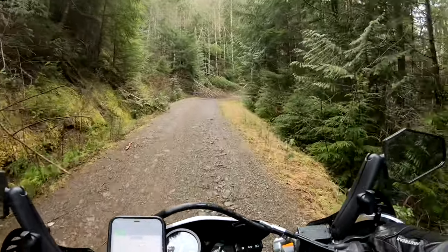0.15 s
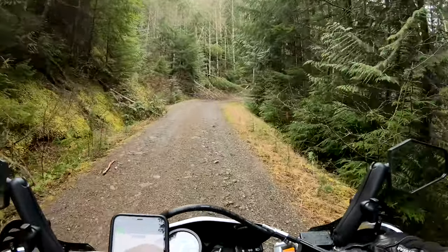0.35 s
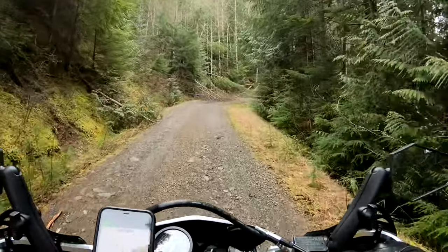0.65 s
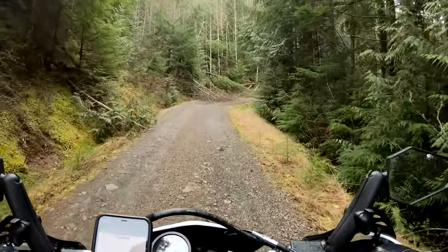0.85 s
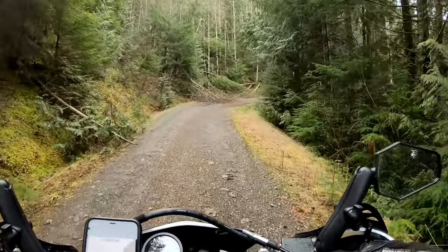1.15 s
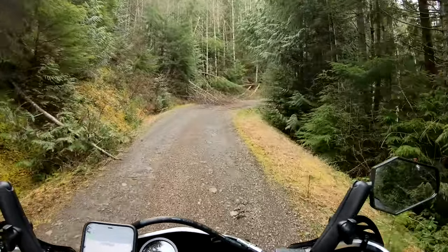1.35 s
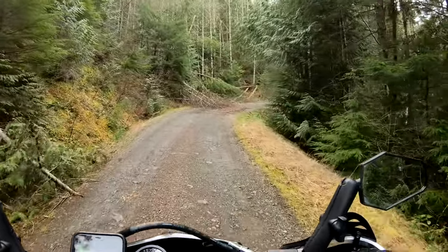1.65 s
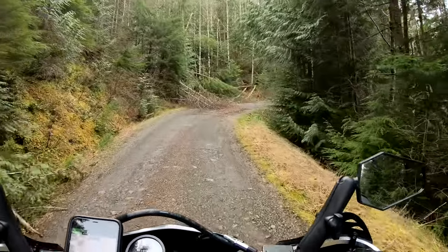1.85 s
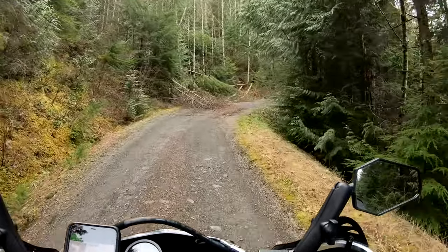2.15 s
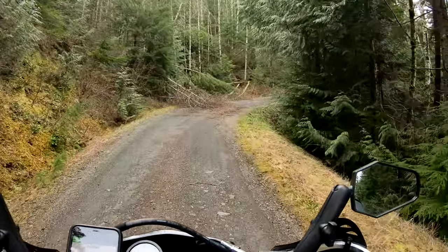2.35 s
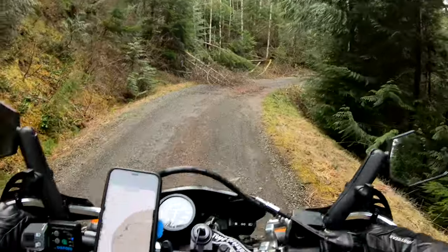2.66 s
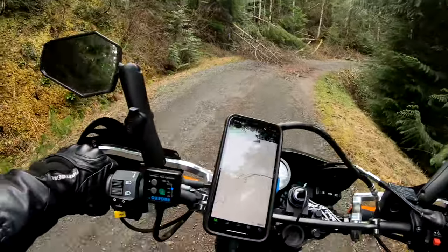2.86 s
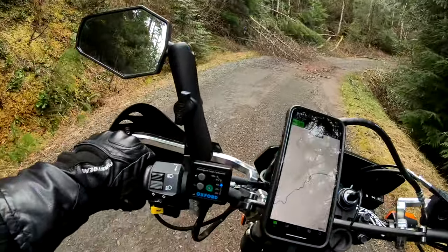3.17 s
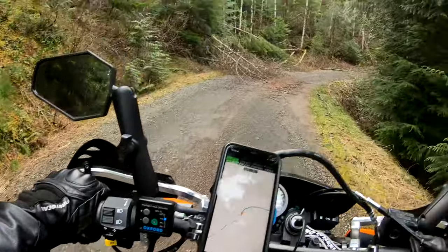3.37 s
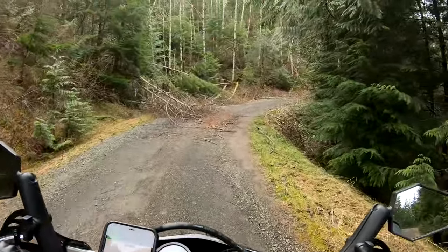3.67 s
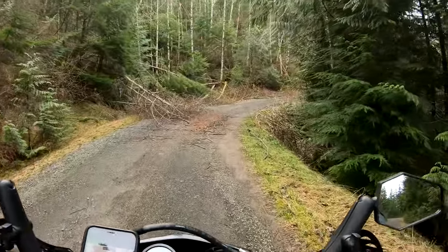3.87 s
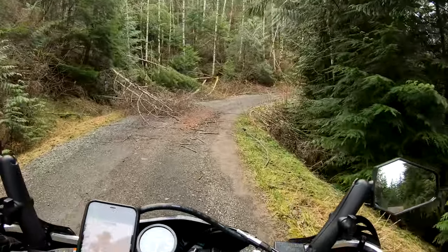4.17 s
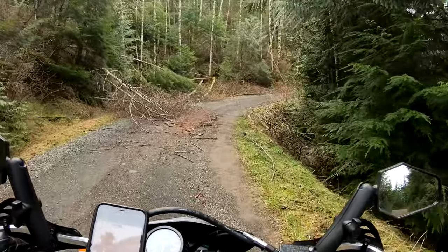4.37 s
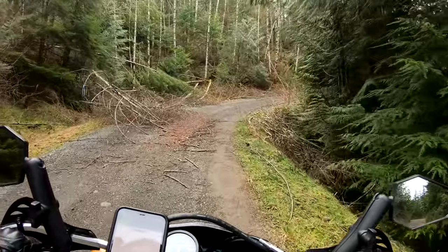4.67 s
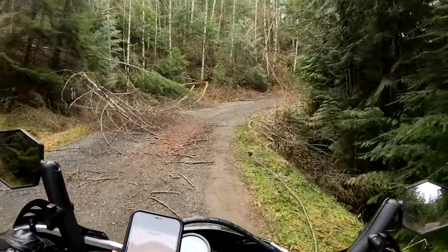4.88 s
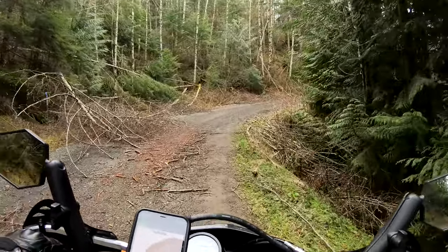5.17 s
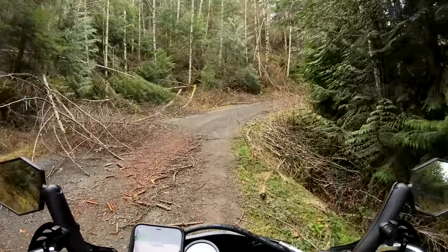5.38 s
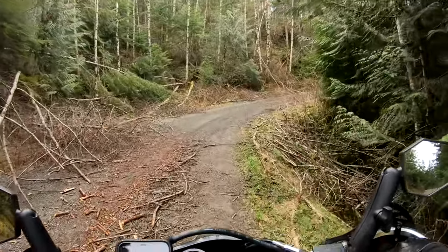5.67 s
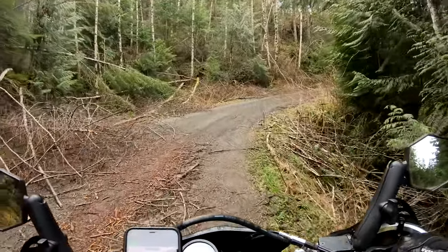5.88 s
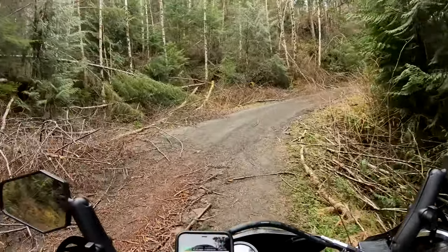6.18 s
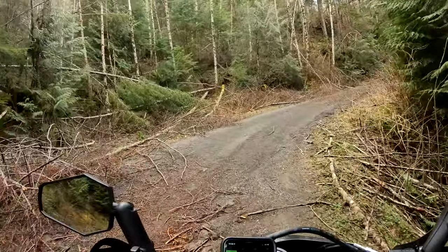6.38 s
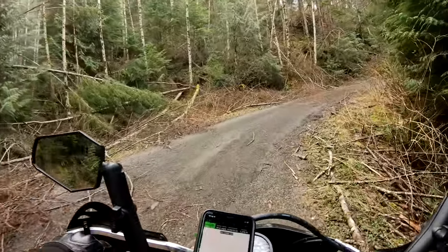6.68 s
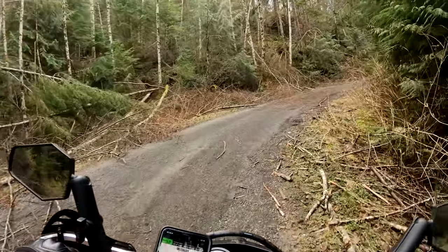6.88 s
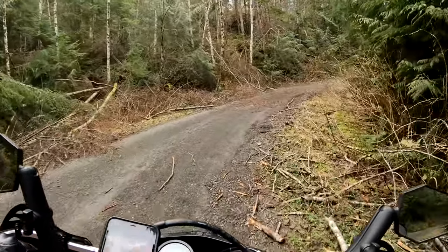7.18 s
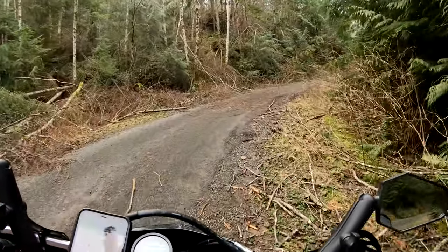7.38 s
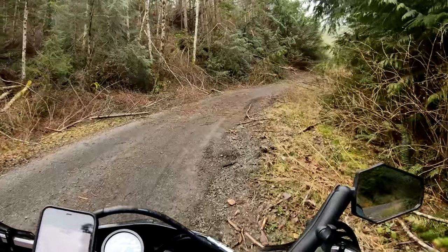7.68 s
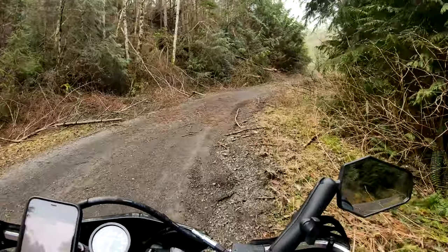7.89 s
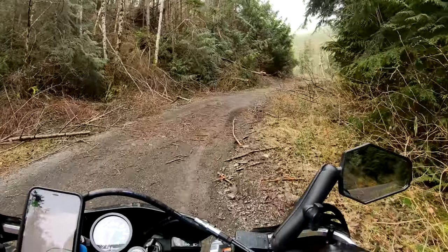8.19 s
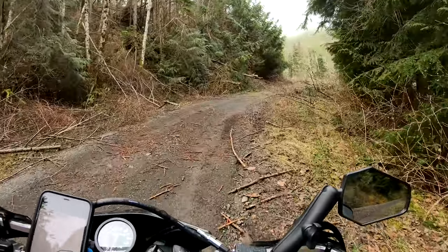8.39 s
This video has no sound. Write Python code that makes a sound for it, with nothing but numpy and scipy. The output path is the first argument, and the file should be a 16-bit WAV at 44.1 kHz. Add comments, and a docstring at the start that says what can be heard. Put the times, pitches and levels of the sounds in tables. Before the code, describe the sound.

Mono, close and dry, from a rider's chest on an open forest road. From 0 to 1.5 s a single-cylinder engine thuds at about 17 beats per second, slowing to 14, over gritty gravel crunch and low wind buffeting; loose fittings rattle in short bursts, stones spray and clank on metal. From 1.5 to 3.6 s it is calmer: soft separate thuds, quieter tyres, few rattles. At 3.6-3.8 s a downshift jumps the beat to about 22, with a deep frame knock near 3.9 s. The throttle opens into a hard, honking drone with stronger metallic combustion knocks and brighter clatter around 4-4.5 s. Near 4.8-4.95 s a faint thin tone climbs, with rasp and hiss. The beat dips near 5.4 s, then steadies around 19-21. A rattle at 6.3 s and twig snaps at 6.5 s precede clanks at 7.5 and 8.15 s; engine, gravel and chain whirr continue to the end.

```python
"""A gravel forest road, heard from the chest of a rider on a single-cylinder four-stroke motorcycle.
It coasts with slow separate thuds while loose fittings rattle over bumps, then changes down and pulls.
Pressure waves ring the airbox and pipe; combustion blows ring the engine cases and silencer.
Shaped noise makes gravel, chain and wind; gated bursts make rattles, snaps, spray and clanks.
A brief thin tone also climbs with a rasp and a hiss."""
import sys
import numpy as np
from scipy import signal
from scipy.fft import rfft, irfft, next_fast_len
from scipy.io import wavfile
from scipy.ndimage import map_coordinates

SR = 44100
rng = np.random.default_rng(int(sys.argv[2]) if len(sys.argv) > 2 else 0)


def transcribe(signal):
    """Save signal, clipped to [-1, 1], as a 16-bit WAV file at the path in sys.argv[1]."""
    frames = np.atleast_2d(signal).T
    limited = np.clip(frames, -1, 1)
    pcm = np.round(limited * 32767).astype(np.int16)
    wavfile.write(sys.argv[1], SR, pcm)


N = 376613
T = np.arange(N) / SR  # time in seconds

# Wind and body sway. Each row: time in seconds, wind level in dB.
WIND_LEVEL = [(0, -23), (.6, -18), (1.1, -24), (2.4, -27), (3.6, -32), (4.9, -32), (5.7, -24), (6.5, -23),
              (7, -26), (7.7, -21), (8.54, -25)]
# Wind spectrum. Each row: frequency in Hz, relative level in dB.
WIND_SPECTRUM = [(4, -11), (10, 19), (20, 5.5), (35, -34.5), (60, -1.5), (120, -11), (300, -75)]

# Gravel crunch spectrum. Each row: frequency in Hz, relative level in dB.
GRAVEL_SPECTRUM = [(400, 21), (800, 10), (1100, 4.5), (1500, 10.5), (2100, 9), (2600, 1.5), (4000, 1),
                   (5200, -1), (7000, -5), (9500, -7.5), (12000, -18.5), (15500, -38)]
# Loose and packed stretches of road. Each row: fluctuation rate in Hz, relative level in dB.
PATCH_SPECTRUM = [(3, -5.5), (12, -13), (40, -17.5), (200, -88)]
# Chain whirr. Each row: time in seconds, level in dB.
CHAIN_LEVEL = [(0, -57.5), (3.5, -60.5), (3.8, -53), (4.3, -57), (6.5, -57), (8.54, -50)]
# Chain and gear resonances. Each row: centre in Hz, width in Hz, relative level in dB.
CHAIN_RESONANCES = [(4830, 130, 0), (5634, 140, 7), (5825, 123, 7), (6450, 550, -3), (7000, 240, -3.5),
                    (8700, 340, -3), (9840, 600, -17)]
# The chain tightens and slackens. Each row: fluctuation rate in Hz, relative level in dB.
FLUTTER_SPECTRUM = [(6, -6.5), (20, -14), (60, -49), (200, -99)]
# Drift of the chain's pitch. Each row: fluctuation rate in Hz, relative level in dB.
DRIFT_SPECTRUM = [(1, -6), (3, 0), (8, -12), (40, -60), (200, -110)]
CHAIN_WANDER = .007  # rms share by which the chain's pitch drifts

# Fittings shaken by stones. Each row: centre in seconds, level in dB, length in seconds.
RATTLE_EVENTS = [(0.135, -28, 0.012), (0.29, -31.5, 0.05), (0.378, -32.5, 0.019), (0.483, -30.5, 0.035),
                 (0.604, -32.5, 0.012), (0.675, -32, 0.048), (0.861, -29.5, 0.02), (0.998, -41, 0.022),
                 (1.085, -32.5, 0.1), (1.372, -31, 0.01), (1.867, -42.5, 0.0092), (2.637, -37, 0.072),
                 (4.95, -37, 0.08), (6.288, -28.5, 0.013)]
# Rattle spectrum. Each row: frequency in Hz, relative level in dB.
RATTLE_SPECTRUM = [(200, -1), (450, 24.5), (750, 6.5), (1100, 7), (1500, 14), (2400, -3), (5500, -13),
                   (8000, -19), (12000, -29), (15500, -55)]
# Gravel flung against the underside. Each row: centre in seconds, level in dB, length in seconds.
SPRAY_EVENTS = [(0.487, -37.5, 0.022), (0.865, -58, 0.014), (1.365, -45, 0.008), (1.444, -46, 0.008)]
# Spray spectrum. Each row: frequency in Hz, relative level in dB.
SPRAY_SPECTRUM = [(1000, -12), (2000, 7), (5500, -7), (8000, -14), (12000, -20), (15500, -32)]
# Twigs snapping under the tyres. Each row: start in seconds, level in dB.
TWIG_SNAPS = [(6.4797, -40), (6.533, -42)]
# Low knocks through the frame. Each row: centre in seconds, pitch in Hz, peak in dB, length in seconds.
FRAME_THUMPS = [(3.868, 70, -11, 0.01), (4.941, 122, -17, 0.049)]
# Sharp blows on the metalwork. Each row: start in seconds, level in dB, ring time in seconds.
METAL_BLOWS = [(0.133, -30, 0.0036), (.229, -29, 0.0055), (0.672, -29.5, 0.0091), (0.852, -30, 0.011),
               (1.362, -36, .009), (1.427, -35, 0.017), (7.513, -35, .025), (8.158, -31, 0.027)]
# Dull crack of a blow. Each row: frequency in Hz, relative level in dB.
CRACK_SPECTRUM = [(300, -10), (500, -2), (1100, -3), (1500, 2), (2400, -13), (4000, -27), (8000, -37),
                  (15500, -70)]

# Waver of the whine's pitch. Each row: fluctuation rate in Hz, relative level in dB.
WAVER_SPECTRUM = [(30, 0), (100, -20), (400, -80)]
# Resonances of the rasp. Each row: centre in Hz, width in Hz, relative level in dB.
RASP_RESONANCES = [(2050, 440, -10), (2530, 460, -7)]
WHINE_S, WHINE_LENGTH_S, WHINE_DB = 4.8, .15, -46  # centre, swell length, level
WHINE_HZ, WHINE_OCTAVES_PER_S = 998, .566  # pitch at the centre, rate of climb
RASP_S, RASP_LENGTH_S, RASP_DB = 4.95, 0.1, -47.5  # peaks as the whine fades

# Engine case resonances. Each row: centre in Hz, width in Hz, relative level in dB.
CASE_RESONANCES = [(938, 78, 3), (1328, 80, 6), (1576, 130, 2), (1917, 61, -0.5), (2077, 45, -2.5),
                   (3125, 120, -13.5), (3480, 39, -8)]
# Resonances struck by each firing. Each row: centre in Hz, width in Hz, relative level in dB.
KNOCK_RESONANCES = [(1327, 126, 9), (1582, 200, 9), (1890, 120, -1), (2113, 190, -2.5), (2800, 430, -13)]
# High case resonances that ping. Each row: centre in Hz, width in Hz, relative level in dB.
PING_RESONANCES = [(3520, 22, -0.5), (3760, 18, -1)]
# Force of the combustion knock. Each row: time in seconds, relative level in dB.
KNOCK_FORCE = [(0, 1), (1.5, -8.5), (3.55, -12), (3.7, 3), (3.8, -4), (3.95, -10), (4.032, 6), (4.31, 8),
               (4.429, 3), (4.6, -1), (5.1, -1), (6, -1), (7, 0), (7.7, -4.5), (8.15, 1), (8.54, -0.5)]
# Single firings that stand out. Each row: time in seconds, change of knock in dB.
ACCENTED_FIRINGS = [(5.285, 6), (5.338, 2), (5.977, 7), (6.133, 2), (6.335, 4), (6.734, 5), (6.835, 3),
                    (6.935, -1), (6.984, 1.5), (7.033, 3.5), (8.208, 6), (8.461, -1)]
# Silencer resonances. Each row: centre in Hz, width in Hz, relative level in dB.
SILENCER_RESONANCES = [(368.5, 62, 1.5), (480.3, 64, -2.5)]
# Bark of the silencer. Each row: time in seconds, level in dB.
BARK_LEVEL = [(0, -47), (1.5, -35), (3.55, -47), (3.8, -37), (4.2, -38), (4.45, -32.5), (5.1, -34.5),
              (5.4, -40), (6.4, -33), (7.2, -37.5), (8.54, -40)]

# Engine speed. Each row: time in seconds, four-stroke cycles per second in Hz.
ENGINE_SPEED = [(0.0, 16.617), (0.408, 16.603), (0.979, 14.852), (1.555, 13.89), (2.357, 14.213),
                (2.812, 14.717), (3.609, 14.161), (3.816, 21.889), (4.374, 20.835), (4.688, 19.17),
                (5.22, 19.258), (5.435, 17.964), (5.814, 19.396), (6.983, 20.234), (7.238, 21.1),
                (8.093, 19.683), (8.24, 20.141), (8.54, 18.967)]
# The rider's hand. Each row: time in seconds, throttle opening from 0 to 1.
THROTTLE_OPENING = [(0, 0.43), (.35, 0.46), (.6, 0.42), (1.1, 0.25), (1.5, 0.11), (3.58, 0.06), (3.8, .9),
                    (4.1, 0.89), (6.4, 0.83), (7.1, 0.93), (8.54, 0.83)]
# The drive snatches and the cycles come unevenly. Each row: time in seconds, rms timing scatter in seconds.
CYCLE_SCATTER = [(0, .0003), (3.9, .0004), (4.0, .00005), (5.2, .00005), (5.3, .0004), (5.5, .0001),
                 (6.1, .00012), (6.4, .0003), (6.8, .0001), (7.3, .0001), (7.7, .0003)]
# Airbox and pipe on a shut throttle. Each row: centre in Hz, width in Hz,
# relative dB when the valve opens, relative dB when it shuts.
COAST_RESONANCES = [(23, 17.6, -24.5, -67), (55.4, 34.8, -30, -37), (75.6, 73, -69, -34),
                    (199.3, 56, -35, -70), (294.2, 42.3, -38.5, -39)]
# Airbox and pipe on an open throttle. Each row: centre in Hz, width in Hz,
# relative dB when the valve opens, relative dB when it shuts.
PULL_RESONANCES = [(35.4, 16.5, -24.5, -73), (84, 13.2, -26.5, -68), (103.6, 33.1, -22.5, -71),
                   (188.9, 93.3, -27.5, -28.5), (230.1, 42, -32.5, -69), (321.4, 24.8, -33, -79),
                   (412, 64, -49.5, -67)]
# Turbulent gas in each gulp. Each row: frequency in Hz, relative level in dB.
GAS_SPECTRUM = [(60, -11), (110, -17), (145, -30.5), (190, -20), (240, -0.5), (280, 4.5), (350, -13),
                (420, -28.5), (480, -15.5), (560, -35), (800, -47), (1500, -85.5)]
# Duct drone. Each row: frequency in Hz, relative level in dB.
DRONE_SPECTRUM = [(60, -48), (110, 1), (150, -9.5), (200, 0.5), (280, -0.5), (380, -3), (480, -2),
                  (550, -10), (750, -24.5), (950, -13.5), (1100, -35.5), (2000, -55.5)]

# The change down: start and end in seconds, step between the gears, and the reference speed in cycles/s.
SHIFT_S, GEAR_STEP, COAST_HZ = (3.61, 3.82), 1.5, 14.2
# Speed laws: dB at the reference speed, dB per doubling of engine speed, dB per doubling of road speed.
CLATTER_LAW = (-45.5, 5.4, 17)
TYRE_LAW = (-43, 11.25, 3.3)
THUD_LAW = (-15.5, 11.2, 12.3)  # relative gain of the gas pulses on a shut throttle
HONK_DB = -14  # relative gain of the gas pulses on an open throttle
PULL_HZ = 19.8  # cycles/s at which the valve's open time is given
# The rider leans aside and shades the tyre noise.
LEAN_S, LEAN_DB, LEAN_LENGTH_S = 3.45, -3, 0.84
# Twigs and loose stones from here on shake the machine harder, adding clatter.
DEBRIS_S, DEBRIS_DB, DEBRIS_RAMP_S = 4.1, 5.75, 0.64
TOP_HZ = 15700  # upper limit of the heard band


def undb(db):
    """Logarithmic level: convert dB to an amplitude ratio."""
    return 10 ** (np.asarray(db) / 20)


def curves(table):
    """Linear interpolation: join each column of a table by straight lines in time."""
    s, *columns = np.transpose(table)
    return [np.interp(T, s, column) for column in columns]


def unit(x):
    """Normalisation: scale to an rms of 1."""
    return x / np.sqrt(np.mean(x ** 2))


def noise():
    """White noise: independent Gaussian samples of equal mean power at all frequencies."""
    return rng.standard_normal(N)


def filtered(x, response):
    """Convolution theorem: multiply the spectrum by a function of frequency."""
    size = next_fast_len(N + SR // 2, True)
    f = np.arange(size // 2 + 1) * SR / size
    return irfft(rfft(x, size) * response(f), size)[:N]


def resonance(f, hz, width):
    """Damped resonance: the response of one mode, 1 at its centre."""
    return 1j * f * width / (hz ** 2 - f ** 2 + 1j * f * width)


def ring(x, modes, order=1):
    """Modal superposition with alternating signs, rms 1; order 2 gives steeper skirts and softer attack."""
    def response(f):
        return sum((-1) ** k * undb(db) * resonance(f, hz, width) ** order
                   for k, (hz, width, db) in enumerate(modes))
    return unit(filtered(x, response))


def colour(x, points):
    """Spectral shaping: interpolate dB over log frequency; rms 1."""
    hz, db = np.transpose(points)
    return unit(filtered(x, lambda f: undb(np.interp(np.log(np.maximum(f, 1)), np.log(hz), db))))


def kicks(times, sizes):
    """Impulsive excitation: place single-sample blows at the given times."""
    return np.bincount(np.clip(times * SR, 0, N).astype(int), sizes, N + 1)[:N]


def window(turn, centre, width):
    """Cyclic gating: a smooth gate opens once in each engine cycle."""
    distance = (turn - centre + .5) % 1 - .5
    return np.exp(-(distance / width) ** 2)


def swell(s, length):
    """Gaussian envelope: a smooth rise and fall around a moment."""
    return np.exp(-((T - s) / length) ** 2)


def moments(turn, share):
    """Phase inversion: find the times at which each engine cycle is this far through."""
    return np.interp(np.arange(int(turn[-1]) + 1) + share, turn, T, right=2 * T[-1])


def repeating(turn, memory):
    """Cycle-to-cycle correlation: noise recurs each engine cycle and changes according to its memory."""
    cycle = turn.astype(int)
    age = np.arange(N) - np.searchsorted(cycle, cycle)  # samples since the cycle began
    fresh = rng.standard_normal((cycle[-1] + 1, SR // 8))
    gain = np.sqrt(1 - memory ** 2)
    cycles, _ = signal.lfilter([gain], [1, -memory], fresh, axis=0, zi=memory * fresh[-1:])
    return cycles[cycle, age]


def speed_level(law, rate):
    """Power law: level in dB grows with the logarithms of engine speed and road speed."""
    db, engine_db, road_db = law
    road = rate / np.interp(T, SHIFT_S, (1, GEAR_STEP))
    return db + engine_db * np.log2(rate / COAST_HZ) + road_db * np.log2(road / COAST_HZ)


def wind():
    """Turbulent pressure: low-frequency noise follows the wind and body sway."""
    return undb(curves(WIND_LEVEL)[0]) * colour(noise(), WIND_SPECTRUM)


def gravel(turn, roll_db):
    """Random impact excitation: stones crunch under the tyres amid a hiss that pulses with the engine."""
    count = 7000
    place, side, weight = rng.random((count, 3)).T
    sizes = np.sign(side - .5) * undb(-3.5 * np.log(np.maximum(weight, .003)))  # few large, many small
    stones = kicks(place * T[-1], sizes)
    pulsing = 1.8 + 0.5 * window(turn, centre=0.95, width=0.14) + 0.8 * window(turn, centre=0.32, width=0.11)
    hiss = noise() * pulsing
    patches_db = 1.1 * colour(noise(), PATCH_SPECTRUM)
    crunch = colour(unit(hiss) + 0.16 * unit(stones), GRAVEL_SPECTRUM)
    return undb(roll_db + patches_db) * crunch


def chain(turn):
    """Modal excitation and time warping: the chain rings with a wandering pitch and level."""
    drive = noise() * (1 + .5 * window(turn, centre=0.89, width=0.042))
    song = ring(drive, CHAIN_RESONANCES, order=2)
    flutter_db = 1.5 * colour(noise(), FLUTTER_SPECTRUM)
    drift = colour(noise(), DRIFT_SPECTRUM)
    # reading the song at an uneven pace bends its pitch
    song = map_coordinates(song, [np.cumsum(1 + CHAIN_WANDER * drift)], mode="mirror")
    return undb(curves(CHAIN_LEVEL)[0] + flutter_db) * song


def bursts(events):
    """Amplitude superposition: add Gaussian envelopes for a list of events."""
    return sum(undb(db) * swell(s, length) for s, db, length in events)


def bumps():
    """Transient excitation: loose fittings chatter, gravel sprays, twigs snap and the frame thumps."""
    # cubing the noise makes it spiky, like separate contacts
    rattles = bursts(RATTLE_EVENTS) * colour(noise() ** 3, RATTLE_SPECTRUM)
    spray = bursts(SPRAY_EVENTS) * colour(noise() * noise(), SPRAY_SPECTRUM)
    decay = sum(undb(db) * (T > s) * np.exp(-np.abs(T - s) / .003) for s, db in TWIG_SNAPS)
    snaps = decay * ring(noise(), [(7350, 1500, 0)])
    thumps = sum(undb(db) * swell(s, length) * np.sin(2 * np.pi * hz * (T - s))
                 for s, hz, db, length in FRAME_THUMPS)
    return rattles + spray + snaps + thumps


def blow(s, length):
    """Impact envelope: a finite contact time rounds the attack and damping gives an exponential decay."""
    age, contact_s = np.maximum(T - s, 0), .0005
    return (1 - np.exp(-(age / contact_s) ** 2)) * np.exp(-age / length)


def clanks():
    """Impact and free decay: stones and chain slap crack against the metalwork, then the cases ring."""
    crack_shape = sum(undb(db) * blow(s, 0.0032) for s, db, _ in METAL_BLOWS)
    crack = crack_shape * colour(noise(), CRACK_SPECTRUM)
    ring_shape = sum(undb(db) * blow(s, length) for s, db, length in METAL_BLOWS)
    ringing = ring_shape * ring(noise(), CASE_RESONANCES, order=2)
    return undb(1.5) * crack + ringing


def whine():
    """Frequency modulation: a thin wavering tone climbs briefly while noise rasps and hisses."""
    hz = WHINE_HZ * 2 ** (WHINE_OCTAVES_PER_S * (T - WHINE_S))
    waver = .008 * colour(noise(), WAVER_SPECTRUM)
    tone = np.sqrt(2) * np.sin(2 * np.pi * np.cumsum(hz * (1 + waver)) / SR)
    tone = undb(WHINE_DB) * swell(WHINE_S, WHINE_LENGTH_S) * tone
    rasp = ring(noise(), RASP_RESONANCES, order=2)
    rasp = undb(RASP_DB) * swell(RASP_S, RASP_LENGTH_S) * rasp
    hiss = undb(-62.5) * swell(s=4.85, length=0.21) * ring(noise(), [(10500, 3000, 0)], order=2)
    return tone + rasp + hiss


def valve_gear(turn, clatter_db):
    """Modal excitation: partly recurring noise from the valve gear rings the cases in every cycle."""
    valves = repeating(turn, memory=0.24) * (0.66 + window(turn, centre=0.24, width=0.12))
    clatter = filtered(ring(valves, CASE_RESONANCES), lambda f: np.exp(-(f / 8000) ** 2))
    return undb(clatter_db) * clatter


def combustion(turn):
    """Impulse response: each firing knocks the cases into ringing and barks in the silencer."""
    firings = moments(turn, share=.77)
    force_db, jitter_s, advance_s_per_db, rebound_s = .8, .00012, .00015, .0095
    early_chance, force_chance, rebound_chance = rng.standard_normal((len(firings), 3)).T
    knock_db, = curves(KNOCK_FORCE)
    # a hard firing comes early, and the piston slaps back after it
    knocks = firings + jitter_s * early_chance - advance_s_per_db * np.interp(firings, T, knock_db)
    rebounds = knocks + rebound_s + jitter_s * rebound_chance
    force = undb(force_db * force_chance)
    blows = kicks(knocks, force) + kicks(rebounds, force * undb(-5.5))
    # parts buzz around each blow
    buzz = noise() * window(turn, centre=0.82, width=0.04)
    accent_db = sum(db * swell(s, .02) for s, db in ACCENTED_FIRINGS)
    knock = (unit(blows) + undb(-1.5) * unit(buzz)) * undb(knock_db + accent_db)
    block = undb(-44.5) * ring(knock, KNOCK_RESONANCES, order=2)
    ping = undb(-61.5) * ring(knock, PING_RESONANCES)
    # the exhaust pulse has a short turbulent wake
    wake = repeating(turn, memory=0.75) * window(turn, centre=0.8, width=0.05)
    exhaust = unit(kicks(knocks, force ** 2)) + .8 * unit(wake)
    bark = undb(curves(BARK_LEVEL)[0]) * ring(exhaust, SILENCER_RESONANCES, order=2)
    return block + ping + bark


def gas_pulses(starts, sizes, modes, open_s, scatter_db, soft_hz):
    """Duct resonance: the opening valve sends a suction wave, the shutting valve a pressure wave."""
    open_chance, slack_chance, shut_chance = rng.standard_normal((len(starts), 3)).T
    slack_s = .00015
    opening = kicks(starts, sizes * undb(scatter_db * open_chance))
    shutting = kicks(starts + open_s + slack_s * slack_chance, sizes * undb(scatter_db * shut_chance))
    suck = filtered(opening, lambda f: sum(undb(db) * resonance(f, hz, w) ** 2 for hz, w, db, _ in modes))
    push = filtered(shutting, lambda f: sum(undb(db) * resonance(f, hz, w) ** 2 for hz, w, _, db in modes))
    # the valve lifts gradually, which rounds the front of each wave
    return filtered(push - suck, lambda f: np.exp(-(f / soft_hz) ** 2))


def ducts(rate, turn, throttle):
    """Pulsed flow: a shut throttle gives soft thuds, an open one a hard honk, with turbulent gas."""
    scatter_s, = curves(CYCLE_SCATTER)
    starts = moments(turn, share=0)
    starts = starts + np.interp(starts, *np.transpose(CYCLE_SCATTER)) * rng.standard_normal(len(starts))
    period_s = 1 / np.interp(starts, T, rate)
    size, load = SR * period_s, np.interp(starts, T, throttle)
    scatter_db, memory, early_s, late_s = .35, .9, .0017, .0014
    coast = gas_pulses(starts - early_s, size * (1 - load), COAST_RESONANCES,
                       open_s=0.1336 * period_s, scatter_db=2 * scatter_db, soft_hz=670)
    pull = gas_pulses(starts + late_s, size * load, PULL_RESONANCES,
                      open_s=0.005784 * (PULL_HZ * period_s) ** 0.64, scatter_db=scatter_db, soft_hz=602)
    rush = colour(repeating(turn, memory), GAS_SPECTRUM) * window(turn, centre=0.26, width=0.28)
    # the gas is most turbulent while the cycles come unevenly
    rush = rush * undb(-7 * (1 - scatter_s / np.max(scatter_s)))
    drone = colour(repeating(turn, memory) + noise() / 2, DRONE_SPECTRUM)
    pulses = undb(16.5) * coast + undb(14.5) * pull
    turbulence = undb(-14.0 + 7.8 * throttle) * rush + undb(-18.5 + 2.0 * throttle) * drone
    pulse_db = (1 - throttle) * speed_level(THUD_LAW, rate) + throttle * HONK_DB
    return (pulses + turbulence) * undb(pulse_db)


def scene():
    """Linear superposition: engine speed and throttle drive the engine; road sounds and wind are added."""
    rate, = curves(ENGINE_SPEED)
    turn = np.cumsum(rate) / SR  # engine cycles done, two crank turns each
    throttle = np.clip(curves(THROTTLE_OPENING)[0], 0, 1)
    roll_db = speed_level(TYRE_LAW, rate) + LEAN_DB * swell(LEAN_S, LEAN_LENGTH_S)
    debris_share = np.clip((T - DEBRIS_S) / DEBRIS_RAMP_S, 0, 1)
    clatter_db = speed_level(CLATTER_LAW, rate) + DEBRIS_DB * debris_share
    road = wind() + gravel(turn, roll_db) + chain(turn) + bumps() + clanks() + whine()
    engine = valve_gear(turn, clatter_db) + combustion(turn) + ducts(rate, turn, throttle)
    return (road + engine)[None]


def record(dry):
    """Saturation and band limiting: round the highest peaks, then cut the top of the spectrum."""
    ceiling = 0.7
    rounded = dry / (1 + (dry / ceiling) ** 4) ** (1 / 4)
    return signal.sosfilt(signal.ellip(8, .2, 70, TOP_HZ, fs=SR, output="sos"), rounded)


dry = scene()
out = record(dry)
transcribe(out)
```